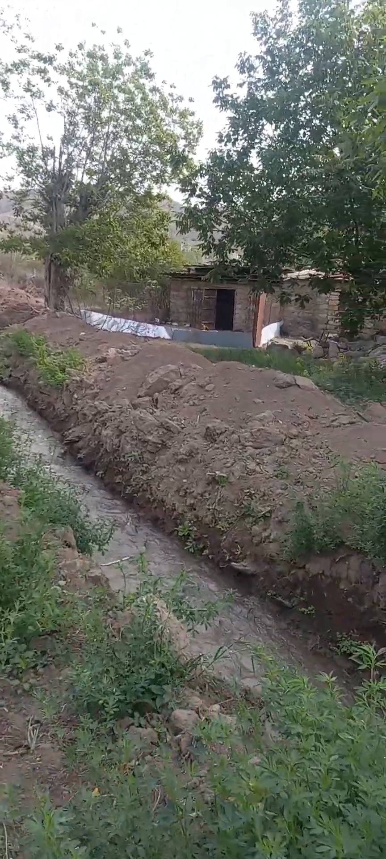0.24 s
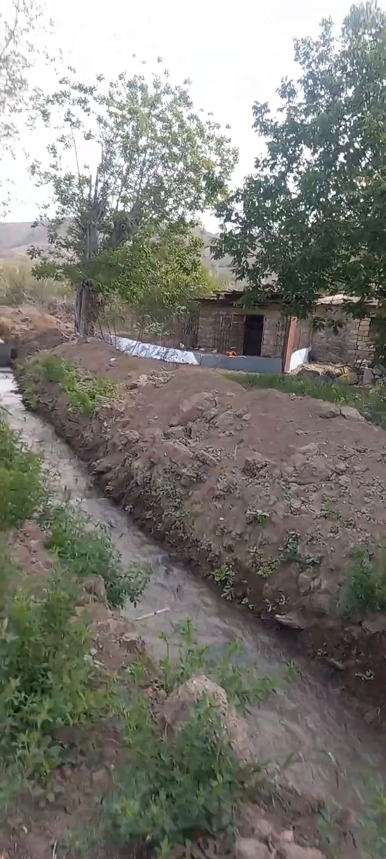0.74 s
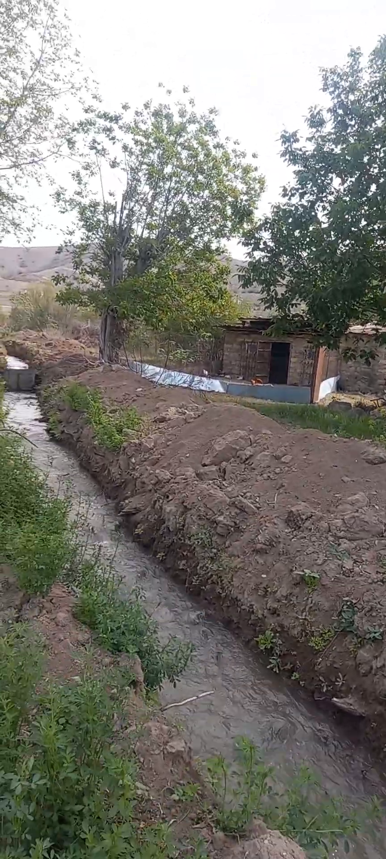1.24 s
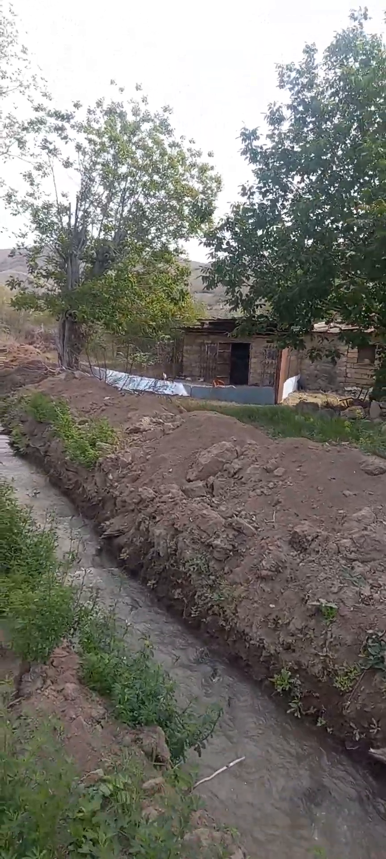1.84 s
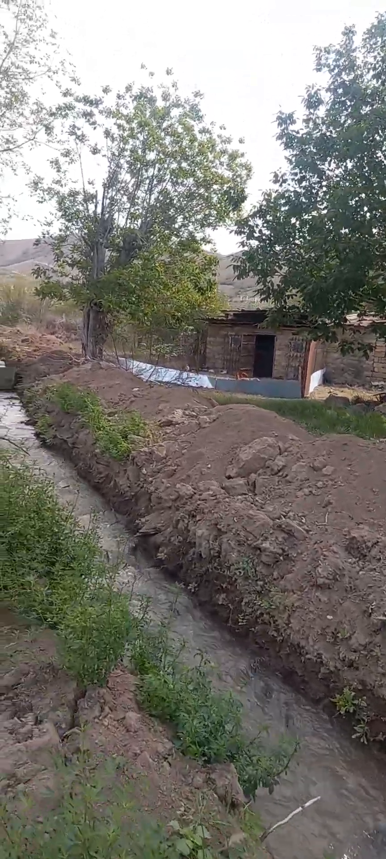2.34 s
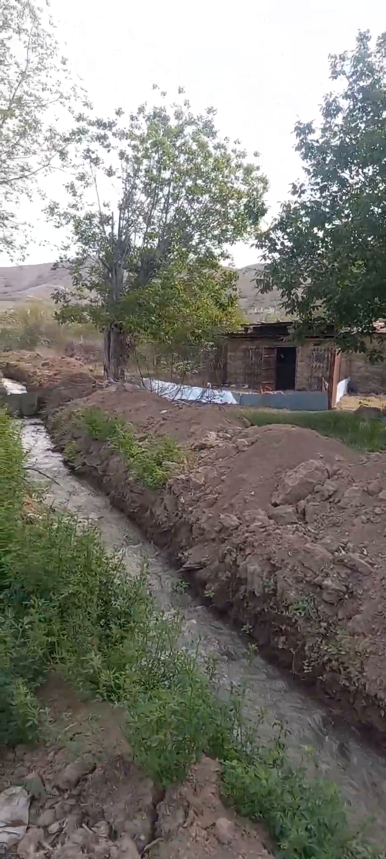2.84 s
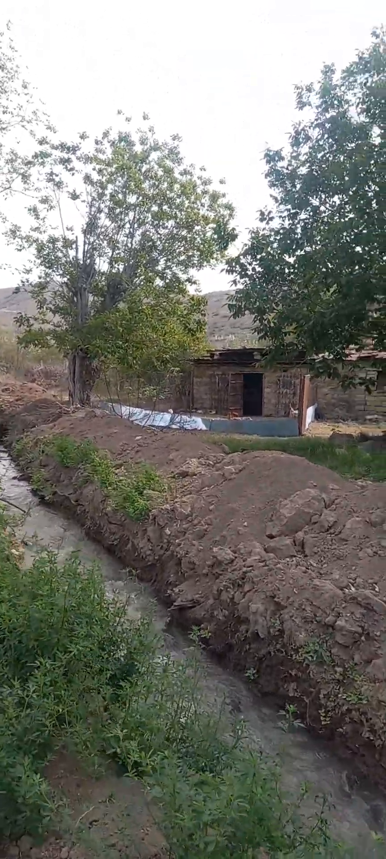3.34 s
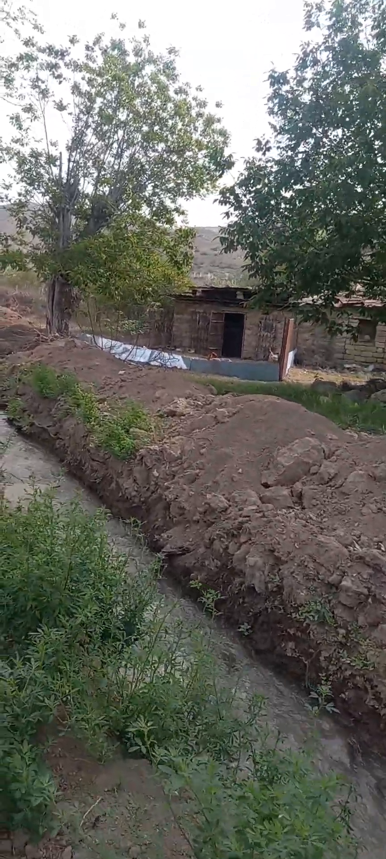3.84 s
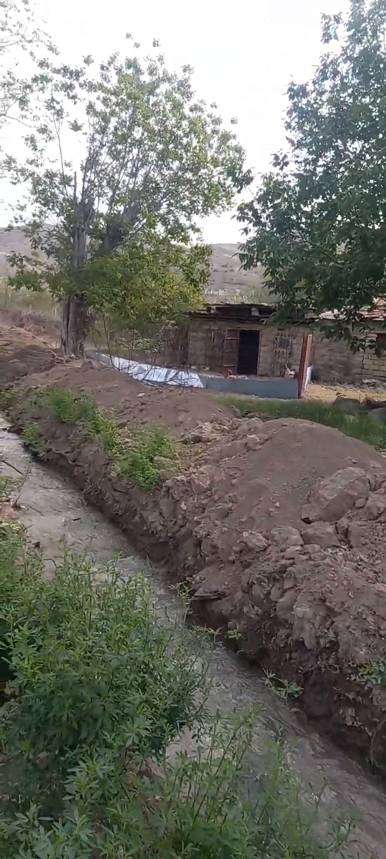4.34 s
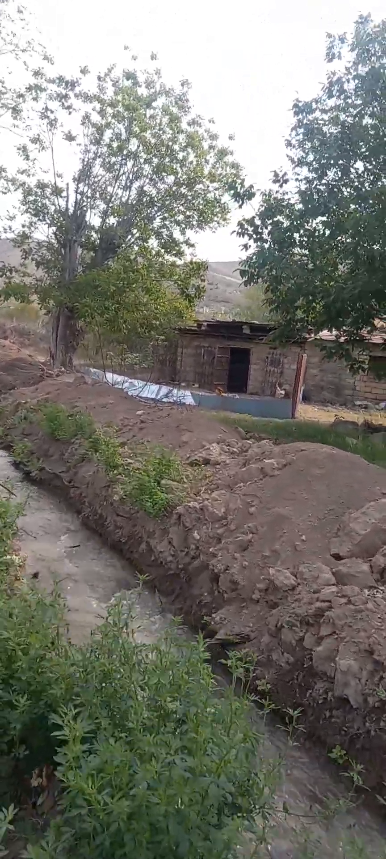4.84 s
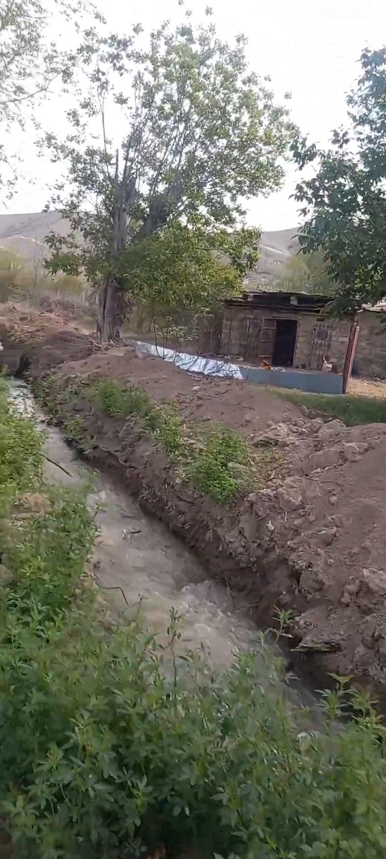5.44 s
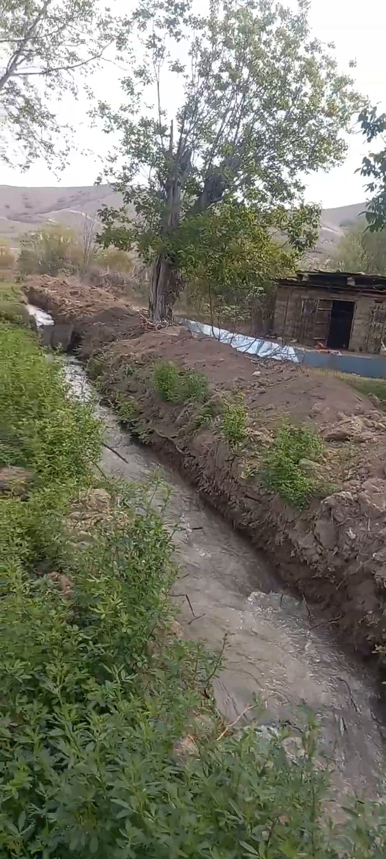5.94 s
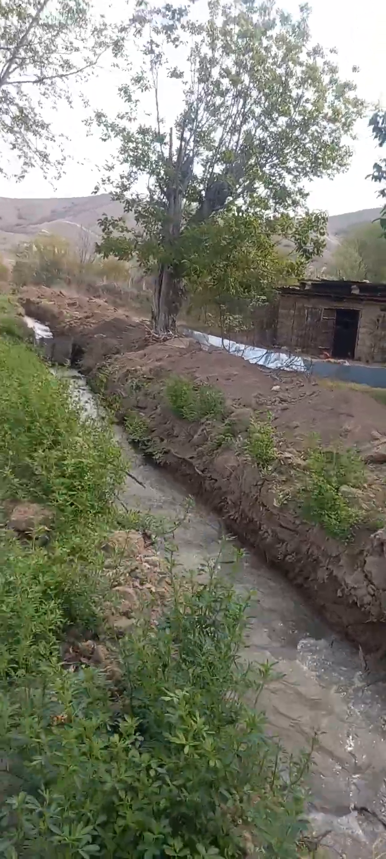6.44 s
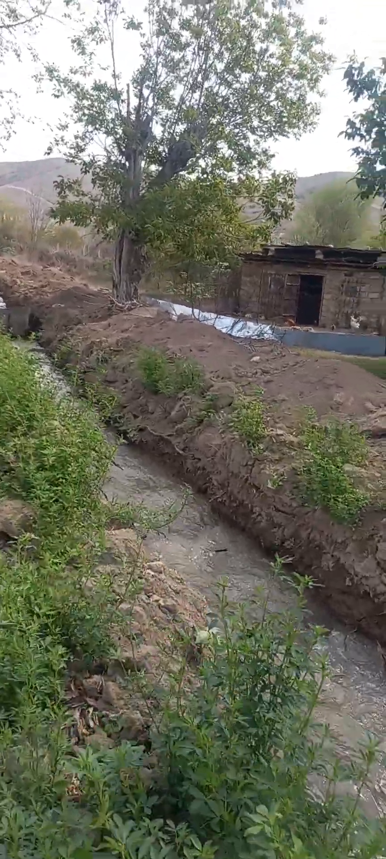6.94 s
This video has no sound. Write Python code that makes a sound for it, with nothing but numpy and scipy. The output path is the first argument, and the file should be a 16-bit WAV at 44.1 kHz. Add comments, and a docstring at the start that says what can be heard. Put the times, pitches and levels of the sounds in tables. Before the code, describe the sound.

Close, lively ditch water churns and plops in the open air while a small bird chirps and wind briefly buffets the microphone.

```python
"""Muddy water babbles along a narrow earth ditch, a little to the right: swarms of ringing bubbles over noise.
Bubble strings gurgle, single large bubbles gulp, bursts of filtered noise slap the bank and crack as drops.
A small bird twitters nearby in gliding, sometimes raspy sine notes with a short scattered tail.
One puff of wind thumps the two microphone ports in turn, as low unsteady sine eddies with fine turbulence.
A faint low rumble of shaped noise lies underneath."""
import sys
import numpy as np
from scipy import signal
from scipy.fft import rfft, irfft, next_fast_len
from scipy.io import wavfile
from scipy.ndimage import uniform_filter1d, map_coordinates

SR = 44100
rng = np.random.default_rng(int(sys.argv[2]) if len(sys.argv) > 2 else 0)


def generate_wav(sig):
    """Save sig (samples, or channels by samples) to the path in sys.argv[1] as 16-bit PCM at SR."""
    pcm = np.round(np.clip(np.atleast_2d(sig).T, -1, 1) * 32767).astype(np.int16)
    wavfile.write(sys.argv[1], SR, pcm)


N = 317506

# Low wind rumble, level before its random lumps: time_s, level_db
RUMBLE_LEVEL = [(0, -44), (1.15, -67.5), (1.72, -51.5), (1.9, -68), (2.02, -52), (2.17, -44), (2.44, -48),
                (2.72, -46), (2.82, -55), (3.45, -62.5), (4.1, -54), (4.5, -64.5), (4.9, -56.5),
                (6.26, -57), (6.32, -39.5), (6.45, -53), (6.72, -41.5), (6.88, -60), (7.0, -37.5),
                (7.1, -54), (7.2, -38)]
# Rumble spectrum: freq_hz, gain_db
RUMBLE_SPECTRUM = [(25, -45), (50, -13), (65, -7), (82, 2), (105, -9), (150, -19.5), (220, -23.5),
                   (400, -42.5)]
# Fine turbulence spectrum: freq_hz, gain_db
TURBULENCE_SPECTRUM = [(25, -39), (60, -15), (110, 1), (180, -4.5), (260, -12), (350, -24), (1200, -100)]
# Eddies of the wind puff, before soft limiting:
# center_s, half_length_s, pitch_hz, level_db, port (left or right)
EDDIES = [(0.599, 0.02, 99, -13, "right"), (0.622, 0.0062, 140, -15.5, "right"),
          (0.653, 0.032, 76.5, -17.5, "right"), (0.693, 0.015, 77.4, -18, "left"),
          (0.744, 0.0099, 129, -24, "left"), (0.775, 0.012, 166.3, -9.5, "left"),
          (0.796, 0.0068, 246, -15.5, "left"), (0.803, 0.023, 90.1, -5.5, "left"),
          (0.841, .012, 102.7, -12.5, "right"), (0.881, 0.0176, 108, -22.5, "left"),
          (0.926, 0.01, 90, -24.5, "left")]
EDDY_PITCH_WAVER, EDDY_TURBULENCE_DB = 0.11, -12  # waver as a fraction of pitch

# Slurred whistles: start_s, length_s, start_hz, end_hz, bow_hz (above a straight glide),
# level_db (relative), rasp (0-1)
SLURS = [(.76, 0.018, 3780, 5030, -200, -32, 0.3), (0.778, 0.043, 5340, 3600, -350, -30, 0.3),
         (0.829, 0.051, 3640, 2950, 550, -36, 0.15), (2.118, 0.2, 4820, 4470, 80.5, -41.5, 0),
         (2.23, 0.034, 4140, 3420, 103, -31.5, 0.14), (2.269, 0.025, 4480, 6520, 306, -26.5, .3),
         (2.346, .05, 4900, 3700, -400, -37, 0.1), (2.883, 0.035, 4700, 4750, 149, -28.5, 0.16),
         (2.936, .045, 4100, 3510, 147, -34, .07), (3.449, 0.021, 4210, 3670, -200, -32.5, .9),
         (3.46, 0.03, 4300, 4280, 0, -34.5, 0.1), (3.59, 0.022, 3460, 3000, 2, -37.5, .3),
         (4.246, 0.027, 5170, 5570, 121, -23, 0), (4.287, 0.049, 4610, 4000, 201, -20, .06),
         (4.423, 0.053, 5590, 5030, 119, -28, 0.1), (4.459, .052, 5330, 3800, -130, -21, 0.08),
         (4.57, 0.034, 3620, 4430, 0, -28, 0.8), (4.788, 0.02, 4760, 4110, 99, -23.5, 0.2),
         (4.983, .075, 4300, 3580, 120, -25.5, 0.1), (5.12, 0.064, 4040, 3430, 115, -30.5, 0.18),
         (5.382, 0.054, 4720, 3680, 0, -34, 0.48), (5.885, 0.13, 3900, 3570, 399, -38.5, 0.1),
         (6.015, 0.056, 4920, 4200, 420, -28, 0.1), (6.148, 0.038, 4540, 3740, 300, -27.5, 0.45),
         (6.258, 0.026, 3770, 4170, 2, -28.5, 0.76), (6.575, 0.018, 3500, 5150, -280, -27, 0),
         (6.758, 0.051, 4250, 3480, 121, -36, .05), (6.998, 0.057, 5370, 4150, -400, -32, 0)]
# Dry chips, mostly in quick runs: start_s, start_hz, level_db (relative)
CHIPS = [(3.656, 5300, -30), (3.692, 5660, -27), (3.739, 5420, -26.5), (3.794, 5020, -30),
         (4.678, 6200, -26.5), (4.729, 6070, -27.5), (5.334, 5440, -27), (5.495, 4700, -28.5),
         (6.375, 5700, -24), (6.409, 6110, -22.5), (6.448, 6250, -22.5), (6.495, 5970, -23),
         (6.907, 5060, -27.5), (6.923, 4060, -23)]
CHIP_LENGTH_S, CHIP_FALL_HZ, CHIP_RASP = .014, 1500, 1
# Pitch flutter of raspy notes: rate, depth at full rasp, irregular part
TRILL_RATE_HZ, RASP_DEPTH_HZ, RASP_GRIT = 125, 430, .45

# Cracks of flung drops: start_s, level_db (relative)
TICKS = [(0.252, -8), (0.447, -3), (1.087, -8), (1.686, -8.5), (2.733, -7), (3.361, -9), (5.863, -4),
         (5.967, -2.5), (6.952, -8)]
TICK_T60_S = 0.026
# Small waves slapping the bank: start_s, level_db (relative)
SLAPS = [(.103, -27), (.152, -28.5), (.281, -28), (.316, -24.5), (2.539, -28), (3.073, -28.5), (4.291, -23),
         (4.905, -22.5), (5.863, -25.5), (6.109, -30.5), (6.765, -27)]
SLAP_T60_S = 0.11

# Single large bubbles: start_s, pitch_hz, rise (pitch fraction per life), level_db (relative)
GULPS = [(0.279, 1084, 0.034, -19), (1.019, 412, 0.11, -33), (1.069, 1100, 0.0088, -22),
         (1.57, 320, 0.24, -32), (1.985, 1346, 0.076, -20.5), (1.985, 597, 0.12, -25.5),
         (2.495, 490, 0.23, -24), (2.538, 519, 0.2, -19), (2.547, 660, 0.18, -18), (2.557, 850, 0.056, -20),
         (2.699, 1130, 0.26, -19.5), (2.762, 790, 0.19, -20), (3.196, 534, 0.27, -16),
         (3.217, 641, 0.25, -15), (4.009, 1085, 0.078, -18), (4.289, 555, 0, -18), (4.31, 433, 0.28, -23.5),
         (4.735, 781, 0.19, -21), (4.8, 502, 0.085, -13), (4.917, 2090, 0.13, -7.5),
         (5.01, 383, 0.34, -20.5), (5.315, 319, .15, -28), (5.568, 896, 0.049, -18),
         (5.6, 2000, 0.098, -12), (5.745, 392, 0.26, -22), (5.861, 746, 0.007, -20),
         (5.908, 505, .05, -22.5), (6.445, 623, 0.12, -24), (6.766, 1350, 0, -11),
         (6.888, 790, 0.092, -18.5), (7.035, 1250, 0.045, -9.5), (7.146, 336, 0.12, -20),
         (7.185, 1073, 0.24, -13)]
# A bubble that climbs further rings longer
GULP_CYCLES, GULP_CYCLES_PER_RISE = 21.6, 45
# Strings of bubbles with gliding pitch: start_s, length_s, start_hz, end_hz, level_db
GURGLES = [(0.228, .16, 1080, 685, -36.5), (0.683, 0.058, 494, 573, -36), (1.039, .07, 493, 650, -40.5),
           (1.171, .17, 725, 850, -41), (1.695, 0.062, 482, 520, -40.5), (2.238, .08, 598, 650, -38),
           (2.591, 0.22, 683, 815, -39.5), (2.828, 0.17, 910, 754, -34.5), (3.262, 0.12, 372, 488, -40),
           (3.617, 0.12, 720, 787, -35), (3.772, 0.12, 633, 528, -33), (4.032, 0.27, 720, 781, -35.5),
           (4.428, .14, 707, 696, -32), (4.825, 0.15, 486, 840, -33.5), (5.147, 0.2, 730, 807, -39),
           (5.37, 0.2, 751, 894, -38), (5.647, 0.068, 390, 240, -36), (5.686, .11, 700, 763, -35),
           (5.848, .11, 770, 652, -35.5), (5.98, 0.19, 557, 742, -30), (6.15, 0.12, 516, 453, -36.5),
           (6.212, .09, 780, 900, -35), (6.329, 0.18, 476, 938, -34.5), (6.567, 0.095, 444, 415, -36.5),
           (6.579, 0.096, 825, 800, -40.5), (6.83, 0.17, 910, 673, -34.5), (6.964, .04, 460, 363, -33)]
GURGLE_BUBBLES_PER_S, GURGLE_CYCLES = 130, 31.4
GURGLE_PITCH_SCATTER = 0.1  # fraction of pitch
# Clouds of like-sized bubbles: center_s, half_length_s, pitch_hz, level_db
SURGES = [(0.103, 0.24, 1480, -34), (0.309, 0.054, 1500, -32), (2.329, 0.018, 1320, -29.5),
          (2.785, 0.025, 2540, -30.5), (3.12, 0.17, 1885, -34.5), (3.978, 0.019, 242.6, -38.5),
          (5.086, 0.48, 1729, -34.5), (5.522, 0.056, 313.6, -38.5), (6.099, .12, 1765, -37),
          (6.769, .01, 2010, -28), (6.867, 0.09, 1703, -32.5), (7.18, 0.032, 550, -25.5)]
SURGE_LUMPS_DB, SURGE_LUMPS_PER_S = 1.5, 35

# Running water spectrum: freq_hz, gain_db
WATER_SPECTRUM = [(71, -60), (120, -20), (171, -27.5), (233, -18), (276, -19.5), (333, -14.5), (715, -5.5),
                  (988, -6), (1270, -3), (1440, -6), (2050, -6), (3090, -14), (4970, -14.5), (6200, -15),
                  (6980, -27), (9070, -36.5)]
# Left-right likeness of broad sources: freq_hz, likeness (0-1)
LIKENESS = [(500, 0.81), (1000, 0.96), (1800, 0.22), (3300, 0.2), (6500, 0.17)]
# Deep churning, growing as the rough stretch comes nearer: time_s, level_db (reference)
CHURN_LEVEL = [(0.0, -41), (1.1, -46), (2.95, -36), (3.48, -39), (3.72, -35.5), (5.61, -36.5), (6.07, -32),
               (6.84, -39), (7.1, -31)]
# Splashing at the surface: time_s, level_db (reference)
SPLASHING_LEVEL = [(0.0, -32.5), (0.65, -31), (0.81, -36), (1.56, -39), (3.02, -29.5), (3.36, -32.5),
                   (4.45, -30.5), (4.55, -32), (5.16, -32.5), (5.57, -33), (6.23, -30.5), (6.68, -32),
                   (7.1, -29)]
# The current slackens between two waves: center_s, half_length_s, depth_db
LULLS = [(0.47, 0.18, 4), (3.404, 0.045, 4.5), (4.652, 0.074, 9), (5.163, 0.067, 3.5)]
# Each bubble size against its reference level
GLUG_DB, BABBLE_DB, SPLASH_DB, SPRAY_DB = -10, 1.5, 1.18, 0
GLUG_SWELL_RATIO, GLUG_LUMPS_DB = 1, 4  # pocket swell relative to the churning; random bunching
SPLASH_LULL_SHARE, SPRAY_LULL_SHARE = 0.69, 0.28
LAPS_PER_S, LAP_DECAY_S, LAP_DEPTH_DB = 22, 0.049, 1.45  # decay to 1/e

# Very faint high noise, spectrum: freq_hz, gain_db
FAINT_TREBLE_SPECTRUM = [(14200, -15.5), (15000, 0.5)]
SOUND_TOP_HZ, FAINT_TREBLE_TOP_HZ = 6960, 15800


def amp(db):
    """Decibels to gain."""
    return 10 ** (np.asarray(db) / 20)


def unit(x):
    """x at rms 1."""
    return x / np.sqrt(np.mean(x ** 2) + 1e-20)


def along(points, hz):
    """(Hz, value) points interpolated on a log frequency axis."""
    point_hz, value = np.transpose(points)
    return np.interp(np.log(hz + 1), np.log(point_hz + 1), value)


def curve(rows):
    """(s, value) rows as one value per sample."""
    return np.interp(np.arange(N) / SR, *np.transpose(rows))


def wobble(t, rate):
    """Smooth random curve over rising times t, rate knots a second."""
    knots = (t - t[0]) * rate
    return map_coordinates(rng.standard_normal(int(knots[-1]) + 4), [knots])


def filtered(x, response):
    """x times a response of frequency."""
    size = next_fast_len(N + SR // 2)
    spectrum = rfft(x, size) * response(np.fft.rfftfreq(size, 1 / SR))
    return irfft(spectrum, size)[..., :N]


def band(hz, low_hz, high_hz, order=8):
    """Gain of a band-pass, steeper with order."""
    low_side = 1 + (low_hz / (hz + 1)) ** (2 * order)
    high_side = 1 + (hz / high_hz) ** (2 * order)
    return (low_side * high_side) ** -.5


def add(track, s, sound):
    """Mix a sound into a track at time s."""
    part = track[..., max(round(s * SR), 0):][..., :sound.shape[-1]]
    part += sound[..., :part.shape[-1]]


def from_right(x, lag_ms, louder_db):
    """Sound from the right reaches the left port later and weaker."""
    sides = np.array([[-.5], [.5]])
    delayed = filtered(x, lambda hz: np.exp(2j * np.pi * hz * sides * lag_ms / 10 ** 3))
    return amp(sides * louder_db) * delayed


def widen(pair):
    """Two unrelated signals become a broad source: alike in the bass, less so in the treble."""
    def mid_side_gains(hz):
        turn = np.arccos(np.clip(along(LIKENESS, hz), -1, 1)) / 2
        return np.array([np.cos(turn), np.sin(turn)])

    mid, side = filtered(pair, mid_side_gains)
    return np.array([mid + side, mid - side])


def steadied(x, size):
    """Noise with its own swells evened out over size samples."""
    power = np.abs(uniform_filter1d(x ** 2, size=size))
    return x / np.sqrt(power + 1e-12)


def rumble():
    """Low wind noise, steadied and then given its own swells and random lumps."""
    noise = widen(rng.standard_normal((2, N)))
    low = filtered(noise, lambda hz: amp(along(RUMBLE_SPECTRUM, hz)))
    lumps_db = 2 * wobble(np.arange(N) / SR, 11)
    return amp(curve(RUMBLE_LEVEL) + lumps_db) * steadied(low, size=3000)


def buffet(eddies):
    """Each eddy shakes one port for a few unsteady cycles, with fine turbulence on top."""
    t, push = np.arange(N) / SR, np.zeros(N)
    noise = rng.standard_normal(N)
    turbulence = unit(filtered(noise, lambda hz: amp(along(TURBULENCE_SPECTRUM, hz))))
    for center_s, half_s, pitch_hz, level_db in eddies:
        near = np.abs(t - center_s) < 4 * half_s
        unsteady_hz = pitch_hz * (1 + EDDY_PITCH_WAVER * wobble(t[near], pitch_hz))
        cycles = rng.random() + np.cumsum(unsteady_hz) / SR
        shake = np.sqrt(2) * np.sin(2 * np.pi * cycles)
        shake += amp(EDDY_TURBULENCE_DB) * turbulence[near]
        envelope = np.exp(-((t[near] - center_s) / half_s) ** 2)
        push[near] += amp(level_db) * envelope * shake
    # the diaphragm gives way softly under the strongest push
    return 1.1 * np.tanh(push / 1.1)


def wind():
    """The puff strikes the two ports at different moments, over the low rumble."""
    left = buffet([eddy for *eddy, port in EDDIES if port == "left"])
    right = buffet([eddy for *eddy, port in EDDIES if port == "right"])
    return np.array([left, right]) + rumble()


def note(length_s, start_hz, end_hz, bow_hz, rasp):
    """One bird note: a bowed glide, made raspy by a fast, slightly irregular trill of its pitch."""
    u = np.linspace(0, 1, int(length_s * SR))
    arch = np.abs(np.sin(np.pi * u))
    trill = np.sin(2 * np.pi * (TRILL_RATE_HZ * length_s * u + rng.random()))
    flutter = trill + RASP_GRIT * wobble(u * length_s, 1100)
    glide_hz = start_hz + (end_hz - start_hz) * u + bow_hz * arch
    hz = glide_hz + rasp * RASP_DEPTH_HZ * flutter
    return arch ** 0.46 * np.sin(2 * np.pi * np.cumsum(hz) / SR)


def bird():
    """Slurred whistles and dry chips; the banks and trees scatter a short, weak tail."""
    song = np.zeros(N)
    for start_s, length_s, start_hz, end_hz, bow_hz, level_db, rasp in SLURS:
        add(song, start_s, amp(level_db) * note(length_s, start_hz, end_hz, bow_hz, rasp))
    for start_s, start_hz, level_db in CHIPS:
        chip = note(CHIP_LENGTH_S, start_hz, start_hz - CHIP_FALL_HZ, 0, CHIP_RASP)
        add(song, start_s, amp(level_db) * chip)
    t = np.arange(SR // 3) / SR
    tail = rng.standard_normal((2, len(t))) * amp(-60 * t / 0.25)
    scatter = signal.fftconvolve(song[None], tail / np.linalg.norm(tail[0]), axes=1)[:, :N]
    return amp(1.5) * from_right(song, lag_ms=0.028, louder_db=7.0) + amp(-7.0) * scatter


def ticks():
    """Flung drops land with a short crack of decaying noise."""
    track, t = np.zeros((2, N)), np.arange(SR // 40) / SR
    for start_s, level_db in TICKS:
        envelope = amp(level_db - 10.0 - 60 * t / TICK_T60_S)
        add(track, start_s, envelope * rng.standard_normal((2, len(t))))
    return filtered(track, lambda hz: band(hz, 1700, 8600, order=2))


def slaps():
    """A wavelet hits the bank: a sudden noise burst, as of small bubbles, that dies quickly."""
    track, t = np.zeros((2, N)), np.arange(SR // 8) / SR
    for start_s, level_db in SLAPS:
        envelope = amp(level_db + 10.5 - 60 * t / SLAP_T60_S)
        add(track, start_s, envelope * rng.standard_normal((2, len(t))))
    splat = filtered(widen(track), lambda hz: band(hz, 600, 2500, order=2))
    return from_right(splat, lag_ms=.14, louder_db=1.5)


def bubble(t, hz, rise, life_s, onset_cycles):
    """An air pocket rings, its pitch shifting by rise as it falls 40 dB in its life."""
    swell = 1 - np.exp(-t * hz / onset_cycles)
    cycles = hz * t * (1 + rise * t / life_s / 2)
    return swell * amp(-40 * t / life_s) * np.sin(2 * np.pi * cycles)


def gulps():
    """Small waves fold over and trap single large bubbles, which wobble as the current squeezes them."""
    track, t = np.zeros(N), np.arange(SR // 4) / SR
    for start_s, pitch_hz, rise, level_db in GULPS:
        life_s = (GULP_CYCLES + GULP_CYCLES_PER_RISE * rise) / pitch_hz
        squeezed_t = np.abs(t + .1 / pitch_hz * wobble(t, pitch_hz / 5))
        # a bubble that climbs further swells more slowly
        ring = bubble(squeezed_t, pitch_hz, rise, life_s, onset_cycles=1.5 + 9 * abs(rise))
        ring *= amp(1.8 * wobble(t, pitch_hz / 5))
        add(track, start_s, amp(level_db + 6.0) * np.tanh(t * pitch_hz) * ring)
    return from_right(track, lag_ms=0.18, louder_db=1.0)


def gurgles():
    """A rolling wave sheds a string of overlapping bubbles that shrink or grow as it turns over."""
    track, t = np.zeros(N), np.arange(SR // 8) / SR
    for start_s, length_s, start_hz, end_hz, level_db in GURGLES:
        count = max(int(length_s * GURGLE_BUBBLES_PER_S), 3)
        string = np.zeros(int(length_s * SR) + len(t))
        for k, (late, detune, loud) in enumerate(rng.uniform(-1, 1, (count, 3))):
            u = (k + .5 + .5 * late) / count
            hz = start_hz * (end_hz / start_hz) ** u * (1 + GURGLE_PITCH_SCATTER * detune)
            gain = np.sqrt(np.sin(np.pi * u)) * amp(3 * loud)
            ring = bubble(t, hz, .12, GURGLE_CYCLES / hz, onset_cycles=2.5)
            add(string, u * length_s, gain * ring)
        string_rms = np.sqrt(np.sum(string ** 2) / (length_s * SR))
        add(track, start_s, amp(level_db) * string / string_rms)
    return from_right(track, lag_ms=.15, louder_db=0.5)


def surges():
    """Where a ripple breaks, a cloud of like-sized bubbles rings as lumpy narrow-band noise."""
    track = np.zeros(N)
    for center_s, half_s, pitch_hz, level_db in SURGES:
        t = np.arange(max(center_s - 3 * half_s, 0), center_s + 3 * half_s, 1 / SR)
        width_hz = .28 * pitch_hz
        drift = wobble(t, width_hz) + 1j * wobble(t, width_hz)
        cloud = (drift * np.exp(2j * np.pi * pitch_hz * t)).real
        lumpy = unit(cloud * amp(SURGE_LUMPS_DB * wobble(t, SURGE_LUMPS_PER_S)))
        envelope = np.exp(-((t - center_s) / half_s) ** 2)
        add(track, t[0], amp(level_db) * envelope * lumpy)
    return from_right(track, lag_ms=0.033, louder_db=3.0)


def laps():
    """Countless tiny laps, each rising at once and fading slowly, as a curve of rms 1."""
    kicks = (rng.random(N) < LAPS_PER_S / SR) * rng.uniform(0.48, 1, N)
    fading = signal.lfilter([1], [1, -np.exp(-1 / (LAP_DECAY_S * SR))], kicks)
    return unit(fading - fading.mean())


def swarm(low_hz, high_hz, rate, cycles, onset_cycles, rush):
    """A pair of bubble swarms, many quiet and a few loud, over the rush of those too small to tell apart."""
    count = int(rate * N / SR)
    when, pitch, length, climb, quiet, bearing = rng.random((count, 6)).T[:, :, None]
    hz = low_hz + (high_hz - low_hz) * pitch
    life_s = cycles * (.5 + length) / hz
    # deep bubbles need only a coarse time grid
    step = max(int(SR / (3 * high_hz)), 1)
    slots = N // step + 1
    n = np.arange(int(cycles / low_hz * SR / step))
    gain = np.sqrt(hz / (.04 + quiet))
    grains = gain * bubble(n * step / SR, hz, .2 * climb - .05, life_s, onset_cycles)
    at = ((when * slots).astype(int) + n).ravel()
    shares = np.cos(2 * np.pi * bearing), np.sin(2 * np.pi * bearing)
    pair = [np.bincount(at, (grains * share).ravel(), slots)[:slots] for share in shares]
    rings = signal.resample_poly(unit(np.array(pair)), step, 1, axis=1)[:, :N]
    return rings + rush * rng.standard_normal((2, N))


def patches(pair, patchy_db, drift_db):
    """The churning surface favours some pitches: in quick patches and in slower, drifting ones."""
    z = signal.stft(pair, nperseg=1024)[2]

    def chance(frames):
        across_pitch = uniform_filter1d(rng.standard_normal(z.shape[1:]), size=3, axis=0)
        return unit(uniform_filter1d(across_pitch, frames, axis=1))

    favour_db = patchy_db * chance(frames=3) + drift_db * chance(frames=24)
    return signal.istft(z * amp(favour_db), nperseg=1024)[1][:, :N]


def register(level_db, low_hz, high_hz, churn):
    """One size class of bubbles, swelling with the flow."""
    uneven = widen(patches(churn, patchy_db=1.3, drift_db=1.8))
    voiced = filtered(uneven, lambda hz: amp(along(WATER_SPECTRUM, hz)) * band(hz, low_hz, high_hz))
    return amp(level_db) * unit(voiced)


def stream():
    """Churning drives the deep glugs and the babble; the breaking surface drives splashes and spray."""
    pockets = swarm(150, 560, rate=300, cycles=16, onset_cycles=8, rush=1.2)
    large = swarm(460, 1150, rate=550, cycles=38, onset_cycles=6, rush=1.35)
    small = swarm(950, 3000, rate=800, cycles=60, onset_cycles=1.2, rush=1.35)
    fizz = swarm(2500, 7300, rate=700, cycles=36, onset_cycles=.3, rush=2.2)
    t = np.arange(N) / SR
    churn_db, splashing_db = curve(CHURN_LEVEL), curve(SPLASHING_LEVEL)
    lull_db = sum(depth_db * np.exp(-((t - center_s) / half_s) ** 2)
                  for center_s, half_s, depth_db in LULLS)
    mean_db = churn_db.mean()
    pockets_db = mean_db + GLUG_SWELL_RATIO * (churn_db - mean_db) + GLUG_LUMPS_DB * wobble(t, 8.8)
    glug = register(pockets_db + GLUG_DB - lull_db, 120, 527, pockets)
    babble = register(churn_db + BABBLE_DB - lull_db, 570, 920, large)
    splash = register(splashing_db + SPLASH_DB - SPLASH_LULL_SHARE * lull_db, 1107, 2810, small)
    spray = register(splashing_db + SPRAY_DB - SPRAY_LULL_SHARE * lull_db, 2470, 9700, fizz)
    surface = amp(LAP_DEPTH_DB * laps()) * (splash + spray)
    # passing ripples lift all sizes of bubble together
    ripple = amp(.9 * wobble(t, 12))
    return ripple * from_right(glug + babble + surface, lag_ms=.14, louder_db=0.77)


def scene():
    """Wind, bird and water in the open air."""
    return wind() + bird() + ticks() + slaps() + gulps() + gurgles() + surges() + stream()


def record(dry):
    """Trim the deepest bass, cut steeply above the band limit and add barely audible noise near 15 kHz."""
    noise = rng.standard_normal((2, N))
    shaped = filtered(noise, lambda hz: amp(along(FAINT_TREBLE_SPECTRUM, hz)))
    faint_treble = amp(-59.5) * unit(shaped)
    trimmed = filtered(dry, lambda hz: band(hz, 44, SR, order=4))
    narrow = filtered(trimmed, lambda hz: band(hz, 1, SOUND_TOP_HZ, order=45))
    return filtered(narrow + faint_treble, lambda hz: hz < FAINT_TREBLE_TOP_HZ)


dry = scene()
out = record(dry)
generate_wav(out)
```